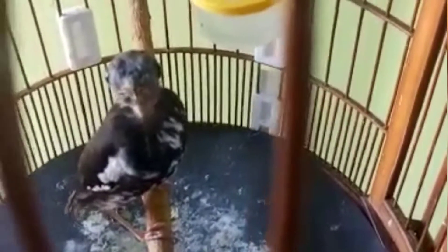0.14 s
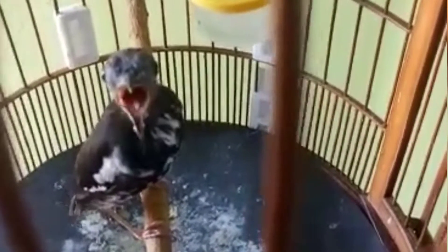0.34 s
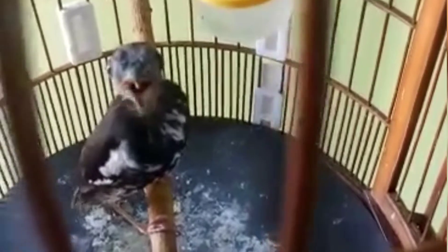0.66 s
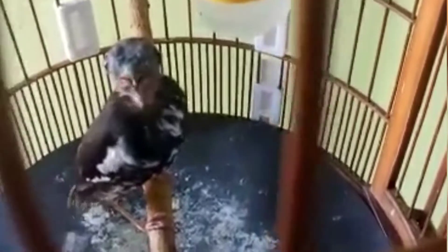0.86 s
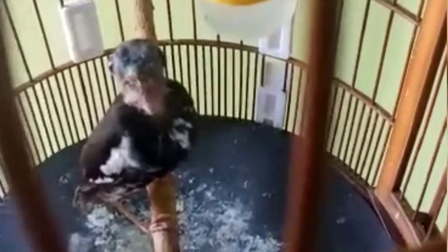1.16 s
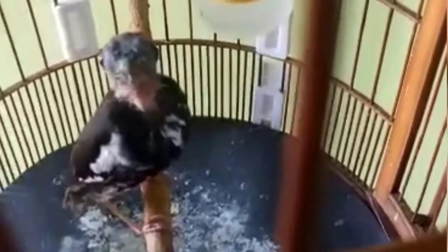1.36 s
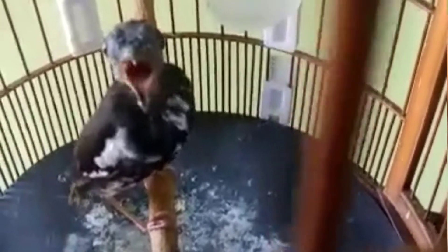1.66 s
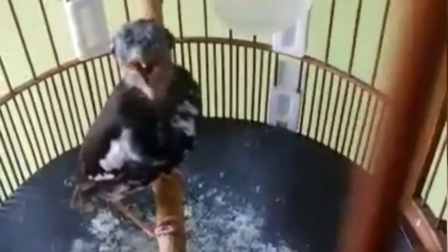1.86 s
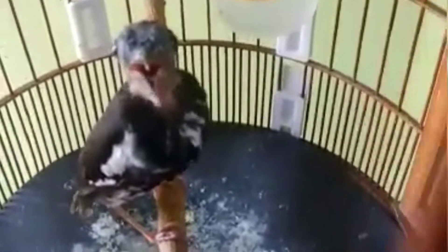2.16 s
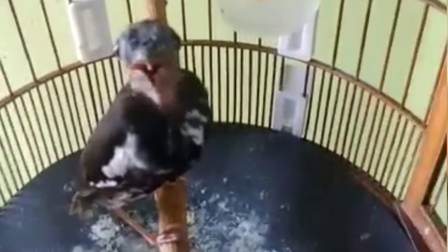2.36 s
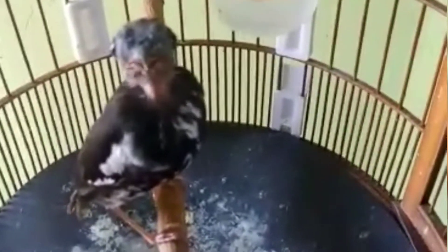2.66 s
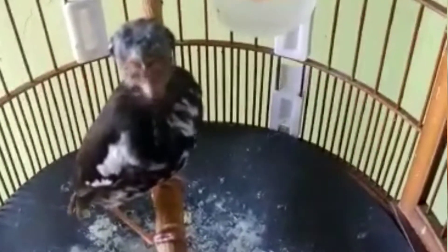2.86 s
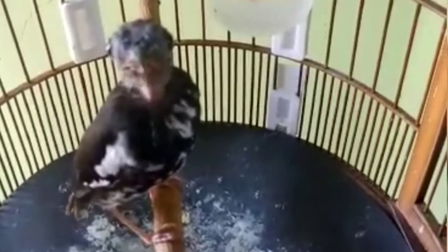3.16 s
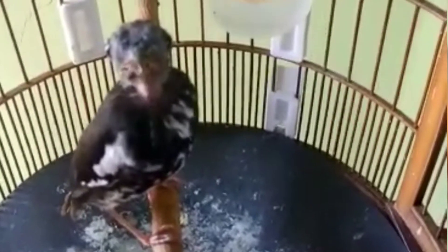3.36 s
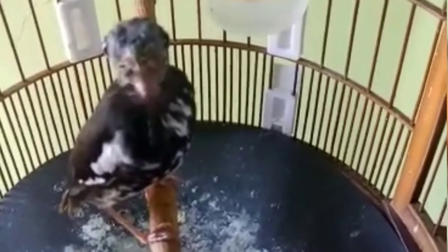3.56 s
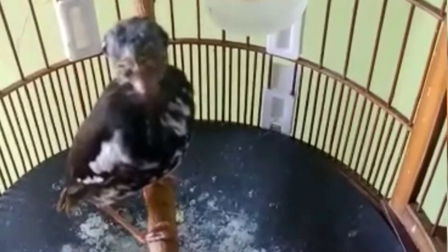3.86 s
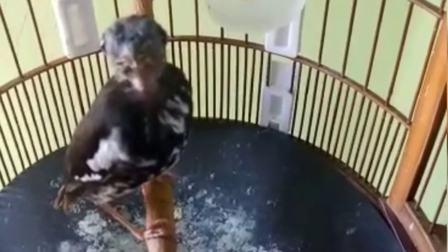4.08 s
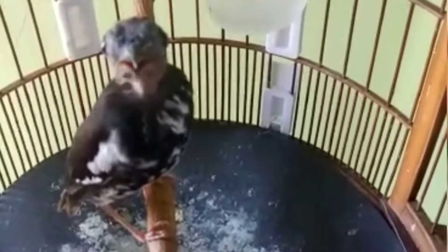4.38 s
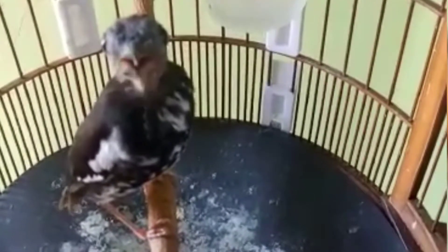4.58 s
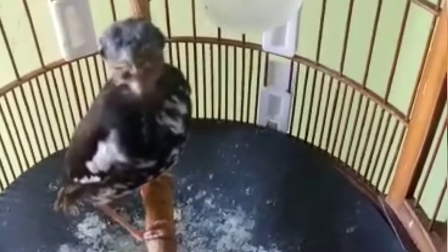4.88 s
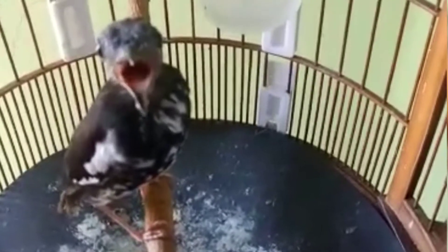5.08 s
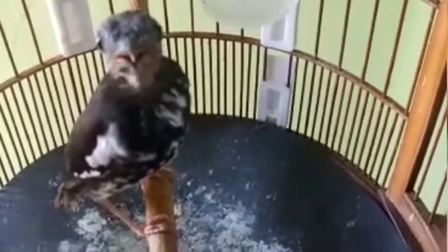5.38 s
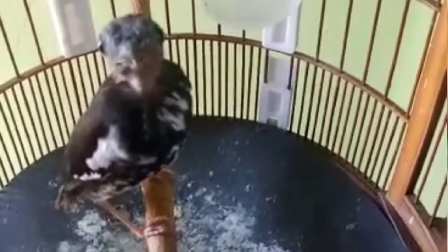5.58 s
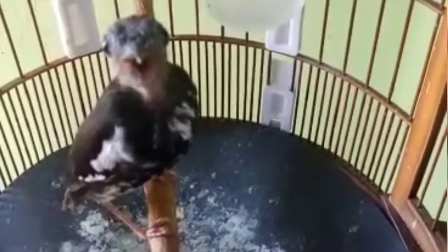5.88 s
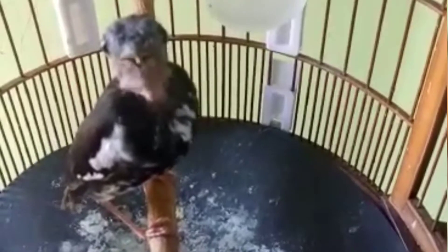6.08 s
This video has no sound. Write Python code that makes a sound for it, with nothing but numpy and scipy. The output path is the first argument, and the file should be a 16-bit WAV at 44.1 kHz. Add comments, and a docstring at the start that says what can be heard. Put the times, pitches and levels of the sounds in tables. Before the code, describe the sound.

Close, bright birdsong runs through quick changing phrases, chirps, whistles, buzz and squeaks, with short hard-walled echoes and distant engines humming underneath.

```python
"""On a hard-walled porch a young thrush sings close by in a wire cage.
Its syrinx is a gliding tone with overtones, coloured by the throat and roughened by turbulent air.
It sings trills, whistles, a rattle, slurs and thin high notes; scatter in the cage and a porch tail echo them.
Shaped noise and wavering tones make far traffic; decaying modes make one knock; another bird calls faintly."""
import sys
import numpy as np
from scipy import signal
from scipy.fft import rfft, irfft
from scipy.io import wavfile
from scipy.ndimage import uniform_filter1d, minimum_filter1d

SR = 44100
rng = np.random.default_rng(int(sys.argv[2]) if len(sys.argv) > 2 else 0)


def store_pcm(level_fs):
    """Save levels as 16-bit WAV."""
    pcm = np.round(np.clip(level_fs, -1, 1) * 32767).astype(np.int16)
    wavfile.write(sys.argv[1], SR, np.atleast_2d(pcm).T)


N = 274741
TIME = np.arange(N) / SR
CUTOFF_HZ = 16200   # top of the passband

# Passage of the throat with the beak wide open: (frequency [Hz], level [dB])
OPEN_THROAT = [(1500, -20), (1900, -3.5), (2400, -2.5), (3000, 1), (3700, 2), (4700, -6), (5750, -11),
               (6250, -15), (6780, 1.5), (7400, -5.5), (8400, -4), (9700, -6.5), (12000, -23)]


def from_db(db):
    """Logarithmic level: decibels to an amplitude ratio."""
    return 10 ** (np.asarray(db) / 20)


def rms_one(x):
    """Normalization of signal power: scale to rms 1."""
    return x / np.sqrt(np.mean(x ** 2) + 1e-20)


def at_hz(points, hz, axis=1):
    """Interpolation on a logarithmic frequency scale: read one column of a table."""
    points = np.array(points)
    return np.interp(np.log(np.maximum(hz, 1)), np.log(points[:, 0]), points[:, axis])


def waver(size, rate_hz):
    """Band-limited random fluctuation: low-passed white noise of rms 1."""
    white = rng.standard_normal(size + 4000)   # the extra samples let the filter settle
    lowpass = signal.butter(2, rate_hz, fs=SR, output="sos")
    return rms_one(signal.sosfilt(lowpass, white)[-size:])


def rounded(curve):
    """Inertia of a control: two moving averages round its corners over about a millisecond."""
    return uniform_filter1d(uniform_filter1d(curve, size=40), size=40)


def envelope(since, length, attack_s, release_s):
    """Onset and decay transients: quarter-sine attack, hold, quarter-sine release."""
    attack = np.sin(np.pi / 2 * np.clip(since / attack_s, 0, 1))
    release = np.sin(np.pi / 2 * np.clip((length - since) / release_s, 0, 1))
    return attack * release


def during(start, end):
    """Discrete time: the sample times of a stretch."""
    return TIME[max(int(start * SR), 0):int(end * SR)]


def add(out, t, sound):
    """Linear superposition: mix a sound in at its sample times."""
    first = round(t[0] * SR)
    out[:, first:first + len(t)] += sound


def street_noise(spectrum):
    """Diffuse-field coherence: shaped stereo noise, most alike in the low range; its middle has rms 1."""
    # Similarity of the two sides: (frequency [Hz], left-right correlation [1])
    likeness = [(30, 1), (250, 0.87), (500, 0.94), (1000, 0.23), (3000, 0.096), (15000, .1)]
    hz = np.arange(N // 2 + 1) * SR / N
    alike = np.clip(at_hz(likeness, hz), 0, 1)
    shape = from_db(at_hz(spectrum, hz)) * (hz > 15)
    mid, side = rfft(rng.standard_normal((2, N))) * shape
    mid = irfft(mid * np.sqrt(1 + alike), N)
    side = irfft(side * np.sqrt(1 - alike), N)
    return (mid + side * [[1], [-1]]) / np.std(mid)


def traffic(rumble_db=-1.0, road_db=3.0, surge_db=1.76):
    """Broadband noise radiation: far engines and tyres, louder on the left, surge unevenly."""
    # Course of the traffic: (time [s], relative rumble level [dB], relative road-noise level [dB])
    course = [(0.0, -33, -32), (0.99, -33, -31), (1.58, -27, -31), (1.82, -31, -34.5), (2.34, -34, -34.5),
              (2.67, -28.5, -36), (2.9, -32, -36.5), (3.8, -33.5, -39), (4.84, -33, -40.5),
              (5.55, -28.5, -37.5), (5.81, -33, -39.5), (6.23, -27.5, -35.5)]
    # Engine rumble: (frequency [Hz], relative spectral level [dB])
    rumble_spectrum = [(15, -47), (25, -21), (40, -6.5), (52, -2), (70, -2), (90, -6), (125, 1), (185, 0),
                       (240, -11), (320, -25.5), (600, -120)]
    # Tyre noise: (frequency [Hz], relative spectral level [dB])
    road_spectrum = [(100, -29.5), (230, -10), (320, 3), (480, -8.5), (720, -5.5), (1100, -9), (1600, -16),
                     (2300, -21), (3400, -28), (4200, -38.5), (5200, -61.5), (15000, -57.5)]
    s, rumble, road = np.transpose(course)
    surge = surge_db * waver(N, 6.8)
    engine_gain = from_db(np.interp(TIME, s, rumble) + rumble_db + surge)
    engines = engine_gain * street_noise(rumble_spectrum) * from_db([[3.3], [-3.3]])
    tyre_gain = from_db(np.interp(TIME, s, road) + road_db + surge / 2)
    tyres = tyre_gain * street_noise(road_spectrum) * from_db([[2.5], [-2.5]])
    return engines + tyres


def hums(swell_db=5.5, flutter_db=3.0, wobble_hz=2.1):
    """Periodic excitation: far engine tones waver in pitch and level, some drifting in pitch."""
    # Engine tones: (start [s], nominal loudest time [s], end [s], first pitch [Hz], last pitch [Hz],
    # relative level [dB])
    tones = [(0, 4, 6.23, 75, 58, -37), (0, 2, 2.4, 149, 149, -33.5), (2, 2.8, 4.4, 148, 146, -31.5),
             (4.3, 7.2, 5.7, 130, 130, -39.5), (1.7, 2.6, 3.9, 190, 169.5, -36),
             (3.5, 2, 4.4, 121, 123, -38), (4.5, 6.6, 7.5, 117, 108, -34.5), (3, 3.9, 4.7, 296, 293, -41.5)]
    out = np.zeros((2, N))
    for start, loudest, end, first_hz, last_hz, level_db in tones:
        t = during(start, end)
        hz = np.interp(t, [start, end], [first_hz, last_hz]) + wobble_hz * waver(len(t), 7.55)
        phase = 2 * np.pi * np.cumsum(hz) / SR
        swell = swell_db * np.interp(t, [start, loudest, end], [1, 0, 1])
        gain = from_db(level_db - swell + flutter_db * waver(len(t), 2))
        tone = np.sqrt(2) * gain * signal.windows.tukey(len(t), .05) * np.sin(phase)
        add(out, t, tone * from_db([[2.8], [-3.8]]))
    return out


def knock(knock_s=2.473, contact_s=0.00074):
    """Modal decay: one dull knock, whose soft contact brings the damped modes in gently."""
    # Modes: (frequency [Hz], relative level [dB], t60 [s])
    mode_table = [(399, -12, 0.054), (560, -24, 0.035), (930, -13, 0.015), (1700, -35, .012),
                  (3120, -28, .01)]
    t = np.maximum(TIME - knock_s, 0)
    modes = sum(from_db(db - 60 * t / t60) * np.sin(2 * np.pi * hz * t) for hz, db, t60 in mode_table)
    return modes * (1 - np.exp(-t / contact_s)) * from_db([[5.0], [1.0]])


def far_bird():
    """Distance attenuation: the same voice model at very low level gives another bird's faint calls."""
    # Calls: (start [s], length [s], onset pitch [Hz], held pitch [Hz], end pitch [Hz], relative level [dB])
    far_calls = [(3.845, 0.04, 3500, 3630, 3480, -48), (4.7, 0.042, 3700, 3700, 3600, -48)]
    return notes(far_calls, settle_s=.008, leave_s=0.0073, attack_s=0.016, release_s=0.019,
                 overtone_db=-40, rasp_db=-38.0, jitter=0.008)


def echoes(song, cage_db=2.5, cage_t60=0.041, left_db=3.5):
    """Reverberation by convolution: quick cage scatter and a porch tail with frequency-dependent decay."""
    # Porch tail: (frequency [Hz], relative level [dB], t60 [s])
    porch = [(1200, -22.5, .6), (1970, -19.5, 0.6), (2950, -14.5, 0.8), (5300, -13, 0.31),
             (7200, -12.5, 0.67), (10000, -10.5, 0.13), (15000, -11.5, 0.25)]
    t, edges = TIME[:SR], np.geomspace(1000, 17000, 11)
    response, white = 0, rng.standard_normal((2, 2, 2, SR))
    for k, (low, high) in enumerate(zip(edges, edges[1:])):
        hz = np.sqrt(low * high)
        band = signal.butter(2, [low, high], "band", fs=SR, output="sos")
        noise = signal.sosfilt(band, white[k % 2])   # neighbouring bands take separate noise
        tail = rms_one(from_db(-60 * t / at_hz(porch, hz, axis=2)) * (t > .008))
        scatter = rms_one(from_db(-60 * t / cage_t60) * (t > .003))
        decay = tail + from_db(cage_db) * scatter
        response = response + noise * from_db(at_hz(porch, hz)) * decay / np.sqrt(SR)
    # both sides of the song feed both sides of the echo
    wet = signal.fftconvolve(song[:, None], response, axes=2).sum(axis=0)
    return wet[:, :N] * from_db([[left_db], [-left_db]]) / np.sqrt(2)


def partial(phase, hz, gain):
    """Interference at nearby surfaces: a gliding sine of given rms reaches each microphone differently."""
    # Microphone differences: (frequency [Hz], left-right level [dB], left phase lead [rad])
    ports = [(1100, 10.5, 1.5), (1250, 13, 1.5), (1400, 4, 2), (1460, 10.5, 1.0), (1820, 5, 0.86),
             (2020, 2, 0.57), (2140, -2.5, 0.5), (2160, 3.5, 2.05), (2700, -3.5, -0.3), (2614, -12, -2),
             (2950, -2.5, -3), (3224, 1, -4.5), (3325, -5, -5.5), (3370, -5, -4), (3703, 10, -6),
             (3950, -3.5, -9), (4470, 6.5, -6), (4280, -2.5, -8), (4970, -1, -13), (5283, 1.5, 7),
             (6100, 22.5, -4), (7040, 19, -14), (7000, 7, -8.5), (7700, -2.5, -11.5), (9300, -5, -10.5),
             (15100, -0.5, -11.5)]
    ratio, lead = from_db(at_hz(ports, hz)), at_hz(ports, hz, axis=2)
    left_share = rounded(ratio ** 2 / (1 + ratio ** 2))
    # each side takes half of the phase difference; reflections need a moment to follow a glide
    half_lead = rounded(rounded(lead)) / 2
    left = np.sqrt(left_share) * np.sin(phase + half_lead)
    right = np.sqrt(1 - left_share) * np.sin(phase - half_lead)
    audible = rounded(1. * (hz < CUTOFF_HZ))
    return 2 * gain * audible * np.array([left, right])


def rasp(size):
    """Turbulence exciting resonances: white air noise rings in the throat; rms 1."""
    # Throat resonances: (frequency [Hz], width [Hz], relative level [dB])
    resonances = [(2410, 480, 5.5), (3950, 410, -0.5), (6830, 480, 0), (10000, 1500, -12),
                  (14400, 1400, -15.5)]
    air, out = rng.standard_normal((2, size)), 0
    for k, (hz, width, level_db) in enumerate(resonances):
        r = np.exp(-np.pi * width / SR)   # pole radius
        b = (1 - r * r) / 2 * np.array([1, 0, -1])
        a = [1, -2 * r * np.cos(2 * np.pi * hz / SR), r * r]
        out = out + (-1) ** k * from_db(level_db) * signal.lfilter(b, a, air)
    return rms_one(out)


def syrinx(t, pitch, gains, overtone_db, rasp_db, jitter, blur=1.0, slope_db=6.0, count=7):
    """Harmonic series of a self-oscillating source: set lower harmonics, blurred upper ones and rasp."""
    # Colour of the upper overtones at the beak: (frequency [Hz], relative level [dB])
    beak = [(4000, 2), (5200, -20), (6600, -16.5), (7800, -10), (8600, -3), (10000, 1), (11400, -2.5),
            (12800, -1.5), (14500, -17), (16000, -4)]
    phase = 2 * np.pi * np.cumsum(pitch * (1 + jitter * waver(len(t), 750))) / SR
    effort = np.sqrt(np.sum(np.square(gains), axis=0))
    tone = 0
    for k, gain in enumerate(gains, 1):
        shimmer = from_db(120 * jitter * waver(len(t), 360))
        tone = tone + partial(k * phase, k * pitch, gain * shimmer)
    for step, k in enumerate(range(len(gains) + 1, count + 1)):
        gain = effort * from_db(overtone_db - slope_db * step + at_hz(beak, k * pitch))
        tone += partial(k * phase + blur * waver(len(t), 300), k * pitch, gain)
    return tone + from_db(rasp_db) * effort * rasp(len(t)) * from_db([[2.5], [-2.5]])


def harmonics(pitch, gain, overtones_db, throat=None):
    """Source-filter principle: the throat weights each lower harmonic at its own frequency."""
    gains = []
    for k, db in enumerate([0, *overtones_db], 1):
        colour_db = at_hz(throat, k * pitch) if throat else 0
        gains.append(gain * from_db(db + colour_db))
    return gains


def notes(rows, settle_s, leave_s, attack_s, release_s, lower_db=(), throat=None, **voice):
    """Exponential relaxation: pitch settles from its onset to a held value and slides off at the end."""
    out = np.zeros((2, N))
    for start, length, onset_hz, held_hz, end_hz, level_db in rows:
        t = during(start, start + length)
        since = t - start
        settling = (onset_hz - held_hz) * np.exp(-since / settle_s)
        leaving = (end_hz - held_hz) * np.exp((since - length) / leave_s)
        pitch = held_hz + settling + leaving
        gain = from_db(level_db) * envelope(since, length, attack_s, release_s)
        add(out, t, syrinx(t, pitch, harmonics(pitch, gain, lower_db, throat), **voice))
    return out


def calls(rows, gesture, edge_s, lower_db=(), **voice):
    """Frequency modulation: an open-beaked call swings smoothly between turning points of pitch."""
    out, (s, turns_hz, shape_db) = np.zeros((2, N)), np.transpose(gesture)
    order = np.arange(len(s))
    for start, ratio, level_db in rows:
        t = during(start, start + s[-1])
        since = t - start
        turn, part = np.divmod(np.interp(since, s, order), 1)
        eased = turn + np.sin(np.pi / 2 * part) ** 2
        pitch = ratio * np.interp(eased, order, turns_hz)
        gain = from_db(level_db + np.interp(since, s, shape_db)) * envelope(since, s[-1], edge_s, edge_s)
        add(out, t, syrinx(t, pitch, harmonics(pitch, gain, lower_db, OPEN_THROAT), **voice))
    return out


def syllable(curve, loud_db, edge_s, **voice):
    """Joint frequency and amplitude modulation: sing one gesture of pitch and loudness."""
    s, hz, level_db = np.transpose(curve)
    out, t = np.zeros((2, N)), during(s[0], s[-1])
    pitch = rounded(np.interp(t, s, hz))
    edges = envelope(t - s[0], s[-1] - s[0], edge_s, edge_s)
    gain = from_db(loud_db + np.interp(t, s, level_db)) * edges
    add(out, t, syrinx(t, pitch, [gain], **voice))
    return out


def twitter():
    """Rapid frequency glides: three very short notes open the song."""
    # Notes: (start [s], length [s], onset pitch [Hz], held pitch [Hz], end pitch [Hz], relative level [dB])
    rows = [(.002, 0.012, 1630, 2440, 2400, -8), (.015, .016, 1620, 2515, 2430, -13),
            (.033, .016, 2750, 2823, 2380, -13)]
    return notes(rows, settle_s=0.0036, leave_s=0.0033, attack_s=0.0089, release_s=0.0036,
                 lower_db=[-16, -12], overtone_db=-23, rasp_db=-11.5, jitter=0.005)


def trill(attack_s=.007, octave_db=-13.0, overtone_db=-26.5, rasp_db=-45.5, jitter=0.0014):
    """Repetition of one modulation pattern: three runs of short, mainly falling notes share one shape."""
    # Trill notes: (start [s], nominal length [s], pitch [Hz], relative peak level [dB])
    rows = [(0.333, 0.023, 3440, -7.5), (0.36, 0.025, 3304, -5.5), (0.391, 0.02, 3270, -6),
            (0.42, 0.021, 3190, -4.5), (0.453, 0.02, 3212, -5.5), (0.479, 0.014, 3230, -9),
            (0.571, 0.027, 3254, -6), (0.603, 0.025, 3195, -4.5), (0.634, 0.021, 3180, -4),
            (0.663, 0.021, 3192, -4), (0.699, 0.014, 3254, -7.5), (0.806, 0.036, 3245, -7),
            (0.84, 0.025, 3282, -4), (0.873, 0.02, 3137, -5), (0.899, 0.02, 3198, -4),
            (0.93, 0.015, 3225, -5.5)]
    # Shape of one note: (share of its length [1], pitch ratio [1], relative level [dB])
    note_shape = [(0, 1.02, -47.5), (.15, 1.014, -4.5), (.35, 1.02, -1.5), (0.751, .965, 0),
                  (.92, 0.929, -9), (1.05, 0.778, -31), (1.251, 0.83, -41.5)]
    out = np.zeros((2, N))
    share, ratio, shape_db = np.transpose(note_shape)
    for start, length, pitch, level_db in rows:
        t = during(start, start + length * share[-1])
        along = (t - start) / length
        swell = np.sin(np.pi / 2 * np.minimum((t - start) / attack_s, 1)) ** 2
        gain = swell * rounded(np.interp(along, share, from_db(shape_db + level_db))) / np.sqrt(2)
        soft_db = np.interp(along, share, shape_db - shape_db.max())   # quiet ends of a note are purer
        glide = pitch * rounded(np.interp(along, share, ratio))
        gains = [gain, gain * from_db(octave_db + soft_db)]
        add(out, t, syrinx(t, glide, gains, overtone_db + soft_db, rasp_db, jitter))
    return out


def whistles(lean_s=0.016, attack_s=0.0068, release_s=0.02, third_db=-12,
             overtone_db=-51.5, rasp_db=-57, jitter=.0024):
    """Resonant filtering: a reedy low note leans to its break, then sweeps up and turns purer."""
    # Whistles: (start [s], break [s], end [s], low pitch [Hz], pitch at the break [Hz], top pitch [Hz],
    # rise time [s], relative levels at the start, the break and the top [dB], octave level [dB])
    rows = [(1.062, 1.111, 1.168, 1268, 1028, 2059, 0.0072, -2, -22.5, -6, -2.5),
            (1.216, 1.265, 1.322, 1150, 1206, 2102, 0.015, -6, -11.5, -6, -11),
            (1.388, 1.439, 1.492, 1155, 1220, 1948, 0.012, -5.5, -15.5, -7.5, -9)]
    # Passage of the throat: (frequency [Hz], level [dB])
    throat = [(1050, -8.5), (1200, -10.5), (1500, -0.5), (1680, 1.5), (2100, 1.5), (2350, -4.5), (2550, -1),
              (3200, -15.5), (4100, -30), (6000, -65.5)]
    out = np.zeros((2, N))
    for row in rows:
        start, split, end, low_hz, break_hz, top_hz, rise_s, *levels_db, octave_db = row
        t = during(start, end)
        away = np.abs(t - split)
        low = low_hz + (break_hz - low_hz) * np.exp(-away / lean_s)
        top = top_hz + (break_hz - top_hz) * np.exp(-away / rise_s)
        pitch = rounded(np.where(t < split, low, top))
        effort = from_db(np.interp(t, [start, split, split + rise_s], levels_db))
        gain = effort * envelope(t - start, end - start, attack_s, release_s)
        gains = harmonics(pitch, gain, [octave_db, third_db], throat)
        add(out, t, syrinx(t, pitch, gains, overtone_db, rasp_db, jitter))
    return out


def doubling():
    """Period doubling: a half-order tone lies between the first two harmonics of the low whistle."""
    # Doubled stretches: (start [s], end [s], whistle pitch [Hz], relative level [dB])
    rows = [(1.204, 1.262, 1153, -29), (1.399, 1.419, 1153, -24)]
    out = np.zeros((2, N))
    for start, end, pitch, level_db in rows:
        t = during(start, end)
        hz = 3 / 2 * pitch * (1 + .03 * waver(len(t), 400))
        phase = 2 * np.pi * np.cumsum(hz) / SR
        add(out, t, partial(phase, hz, from_db(level_db) * signal.windows.tukey(len(t))))
    return out


def rattle(trough_hz=1465, trough_db=-3.0, fall_db=3.5, octave_db=2.0, octave_db_per_s=34, third_db=-3.5,
           overtone_db=-16.5, rasp_db=-7.5, jitter=0.025):
    """Cyclic modulation: the octave flares as each note falls, and the run is harshest in its middle."""
    # Notes: (time of the crest [s], crest pitch [Hz], relative level [dB])
    rows = [(1.662, 1988, -19), (1.675, 1880, -15), (1.69, 1975, -23.5), (1.704, 2032, -24),
            (1.716, 2232, -18.5), (1.734, 2239, -22), (1.751, 2008, -23), (1.770, 1998, -22),
            (1.788, 1913, -22), (1.807, 1933, -24.5), (1.831, 1936, -18.5), (1.853, 1873, -27),
            (1.876, 2003, -20), (1.899, 1940, -19.5), (1.916, 1738, -27.5)]
    harshest_s, harsh_span_s, harsh_range_db = 1.7946, 0.073, 37.5
    s, crest, level_db = np.transpose(rows)
    out, t = np.zeros((2, N)), during(s[0] - .004, s[-1] + .008)
    swing = np.pi * np.interp(t, s, np.arange(len(s)))
    arch = np.abs(np.cos(swing)) ** 1.8   # 1 at a crest, 0 in a trough
    pitch = trough_hz + (np.interp(t, s, crest) - trough_hz) * arch
    loudness_db = np.interp(t, s, level_db) + trough_db * (1 - arch) ** 4
    first = from_db(loudness_db) * signal.windows.tukey(len(t), .02)
    flare_db = fall_db * np.sin(2 * swing)
    octave = first * from_db(octave_db + octave_db_per_s * (t - harshest_s) + flare_db)
    harsh_db = harsh_range_db * (np.exp(-((t - harshest_s) / harsh_span_s) ** 4) - 1)
    third = first * from_db(third_db + harsh_db)
    add(out, t, syrinx(t, pitch, [first, octave, third], overtone_db + harsh_db, rasp_db + harsh_db, jitter))
    return out


def puffs(rows, level_db, decay_s):
    """Exponentially decaying turbulence: a puff of air escapes as each note starts."""
    out = np.zeros((2, N))
    for start, *_, note_db in rows:
        t = during(start, start + .06)
        decay = np.exp(-(t - start) / decay_s)
        add(out, t, from_db(note_db + level_db) * decay * rasp(len(t)))
    return out


def slurs():
    """Downward glides through a fixed resonator: falling slurs, each started by a puff of air."""
    # Slurs: (start [s], length [s], onset pitch [Hz], held pitch [Hz], end pitch [Hz], relative level [dB])
    rows = [(2.014, 0.1, 1960, 1448, 1214, -9.5), (2.188, 0.1, 3156, 1520, 1288, -11),
            (2.362, 0.099, 2844, 1571, 1300, -8.5), (2.5425, 0.098, 3904, 1663, 1337, -8.5)]
    # Passage of the throat: (frequency [Hz], level [dB])
    throat = [(1200, -11.5), (1550, -5), (2000, -11), (2400, 0.5), (2900, -0.5), (3300, -1), (3800, -1.5),
              (4300, -3.5), (4800, -20), (6000, -30.5)]
    tones = notes(rows, settle_s=0.0074, leave_s=0.0115, attack_s=0.0026, release_s=0.0097,
                  lower_db=[0, -30], throat=throat, overtone_db=-48, rasp_db=-55, jitter=.0045)
    return tones + puffs(rows, level_db=-30.5, decay_s=.008)


def chips():
    """Random frequency jitter: two rough calls with a strong octave and third harmonic."""
    # Gesture: (time from the start [s], pitch [Hz], relative level [dB])
    gesture = [(0, 2788, -32), (.005, 2816, -34), (.018, 1849, -16), (.026, 3340, -22),
               (0.0317, 2200, -12.5), (.036, 3434, -16), (.041, 1780, -19.5), (0.045, 1770, -18.5),
               (0.053, 1830, -26.5)]
    # Calls: (start [s], pitch ratio [1], relative level [dB])
    rows = [(2.934, 1.0, -2.5), (3.223, 1.01, -5)]
    return calls(rows, gesture, edge_s=.002, lower_db=[0, -3], overtone_db=-18.5, rasp_db=-8.5, jitter=0.027)


def zips():
    """Wide frequency modulation: two high calls swing rapidly up and down."""
    # Gesture: (time from the start [s], pitch [Hz], relative level [dB])
    gesture = [(0, 3276, -20.5), (0.0104, 5750, -3), (.02, 3590, -25), (.032, 6020, -6.5),
               (0.039, 3185, -24), (0.047, 5880, -7.5), (.054, 3700, -18.5), (0.062, 5600, -26),
               (.066, 3900, -36)]
    # Calls: (start [s], pitch ratio [1], relative level [dB])
    rows = [(4.280, 1.0, -2.5), (4.417, 1.005, -2.5)]
    return calls(rows, gesture, edge_s=0.0024, overtone_db=-12.5, rasp_db=-17.0, jitter=0.021)


def seeps(onset_hz=3400, held_hz=7570, settle_s=.0055, warble_hz=124.4, depth_hz=940, calm_s=0.065,
          attack_s=0.014, release_s=0.059, pulse_db=8, overtone_db=-8.5, rasp_db=-21.5, jitter=.011):
    """Coupled vibrato and tremolo: pitch climbs under a calming warble, whose dips are loud pulses."""
    # High notes: (start [s], length [s], relative level [dB])
    rows = [(4.6265, .062, -13.5), (4.8094, 0.061, -13)]
    out = np.zeros((2, N))
    for start, length, level_db in rows:
        t = during(start, start + length)
        since = t - start
        warble = np.cos(2 * np.pi * warble_hz * since)
        climb = held_hz + (onset_hz - held_hz) * np.exp(-since / settle_s)
        pitch = climb + depth_hz * np.exp(-since / calm_s) * warble
        pulses = from_db(level_db - pulse_db * (1 + warble) / 2)
        gain = pulses * envelope(since, length, attack_s, release_s)
        gains = harmonics(pitch, gain, [], OPEN_THROAT)
        add(out, t, syrinx(t, pitch, gains, overtone_db, rasp_db, jitter))
    return out


def thin_note():
    """Frequency modulation at low level: one thin high note."""
    # Gesture: (time [s], pitch [Hz], relative level [dB])
    curve = [(5.147, 7740, -37), (5.16, 8360, -29), (5.208, 7970, -28.5), (5.232, 7350, -37),
             (5.239, 5500, -29), (5.2455, 6970, -14), (5.25, 9030, -29), (5.258, 8360, -26),
             (5.27, 8400, -34)]
    return syllable(curve, loud_db=-3.0, edge_s=0.0029, overtone_db=-10.5, rasp_db=-30.5, jitter=.007)


def flicks():
    """Rapid frequency sweep: two very high calls leap up and waver."""
    # Gesture: (time from the start [s], pitch [Hz], relative level [dB])
    gesture = [(0, 4780, -42), (.005, 5640, -12.5), (0.0123, 10050, -16), (0.021, 7530, -20.5),
               (.0265, 9200, -27), (0.039, 6800, -30)]
    # Calls: (start [s], pitch ratio [1], relative level [dB])
    rows = [(5.3115, 0.98, -3), (5.3895, 0.95, -4)]
    return calls(rows, gesture, edge_s=.002, overtone_db=-10, rasp_db=-17, jitter=0.011)


def squeak():
    """Strong frequency jitter: one unsteady squeak zigzags downward."""
    # Gesture: (time [s], pitch [Hz], relative level [dB])
    curve = [(5.523, 8900, -27), (5.536, 8600, -36), (5.543, 7200, -31), (5.548, 8060, -20.5),
             (5.554, 6700, -25), (5.559, 7950, -16.5), (5.564, 6200, -31), (5.57, 6850, -9.5),
             (5.577, 6150, -26.5), (5.605, 4770, -30.5)]
    return syllable(curve, loud_db=-3.5, edge_s=0.0025, overtone_db=-9.5, rasp_db=-16.5, jitter=0.028)


def undertones():
    """Two independent sources: the other side of the syrinx joins in under the high calls."""
    # Notes: (start [s], length [s], onset pitch [Hz], held pitch [Hz], end pitch [Hz], relative level [dB])
    rows = [(4.289, 0.0064, 2750, 2410, 2400, -27), (4.317, 0.0073, 2900, 2540, 2730, -19),
            (4.428, .009, 2540, 2260, 2490, -39), (5.313, 0.0078, 2300, 2720, 3440, -40.5),
            (5.391, 0.0079, 2260, 2510, 2960, -30), (5.57, 0.033, 3490, 3000, 2480, -38)]
    return notes(rows, settle_s=0.0029, leave_s=0.0036, attack_s=.003, release_s=0.0049,
                 overtone_db=-14, rasp_db=-3.5, jitter=0.031)


def loops():
    """Continuous frequency glides: downstrokes and arches close the song."""
    # Notes: (start [s], length [s], onset pitch [Hz], held pitch [Hz], end pitch [Hz], relative level [dB])
    rows = [(5.792, 0.017, 4560, 2300, 2220, -9), (5.806, 0.012, 3250, 2680, 1930, -11),
            (5.824, 0.055, 2170, 4030, 2440, -9), (6.173, 0.013, 4360, 1910, 1780, -7.5),
            (6.204, 0.03, 2165, 3457, 3235, 4)]
    return notes(rows, settle_s=0.0053, leave_s=.008, attack_s=0.0063, release_s=0.0031,
                 overtone_db=-48.0, rasp_db=-48, jitter=0.0026)


def peak_note():
    """Nearly pure tone with a gliding pitch: a note rises, then falls steeply between the loops."""
    # Gesture: (time [s], pitch [Hz], relative level [dB])
    curve = [(5.935, 4670, -13), (5.944, 4660, -9), (5.95, 4750, -10), (5.958, 5280, -19),
             (5.978, 5314, -18), (5.987, 4730, -23), (5.994, 3740, -2.5), (6.006, 3160, -6.5),
             (6.012, 2710, -9.5), (6.022, 2500, -15.5)]
    return syllable(curve, loud_db=-1.5, edge_s=.002, overtone_db=-27.5, rasp_db=-43, jitter=0.0028)


def scene():
    """Superposition of direct and reverberant sound: the song and its echoes over the street."""
    street = hums() + traffic() + knock()
    song = (twitter() + trill() + whistles() + doubling() + rattle() + slurs() + undertones() + zips()
            + seeps() + thin_note() + flicks() + squeak() + loops() + peak_note())
    rough = chips()
    wet = echoes(song + from_db(-1.0) * rough)
    bird = song + rough + from_db(-1.5) * wet
    return from_db(3.5) * bird + far_bird() + street


def gain_control(x, threshold_db=-18, share=0.34, release_db_per_s=260):
    """Dynamic range compression: loud notes turn everything down, and the street soon returns."""
    power = uniform_filter1d(np.mean(x ** 2, axis=0), size=220)
    level_db = 10 * np.log10(np.maximum(power, 1e-9))
    # the held level follows rises at once and falls at the release rate
    fall = release_db_per_s * TIME
    held_db = np.maximum.accumulate(level_db + fall) - fall
    return x * from_db(-share * rounded(np.maximum(held_db - threshold_db, 0)))


def record(dry):
    """Compression, peak limiting and low-pass filtering: even the song, limit it, then cut the top."""
    even = gain_control(dry)
    gain = 1 / np.maximum(np.abs(even).max(axis=0), 1)
    gain = rounded(minimum_filter1d(gain, size=160))
    lowpass = signal.ellip(10, .1, 80, CUTOFF_HZ, fs=SR, output="sos")
    return signal.sosfilt(lowpass, even * gain)


dry = scene()
out = record(dry)
store_pcm(out)
```